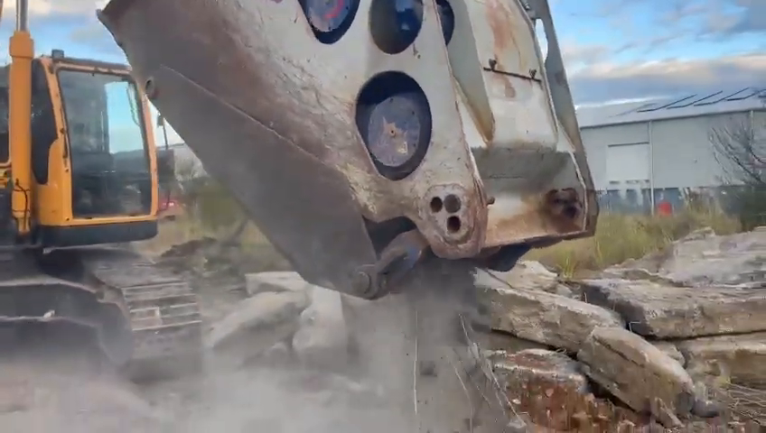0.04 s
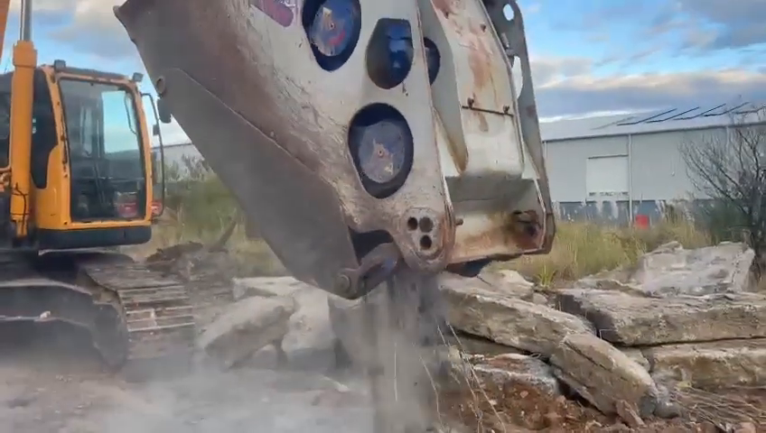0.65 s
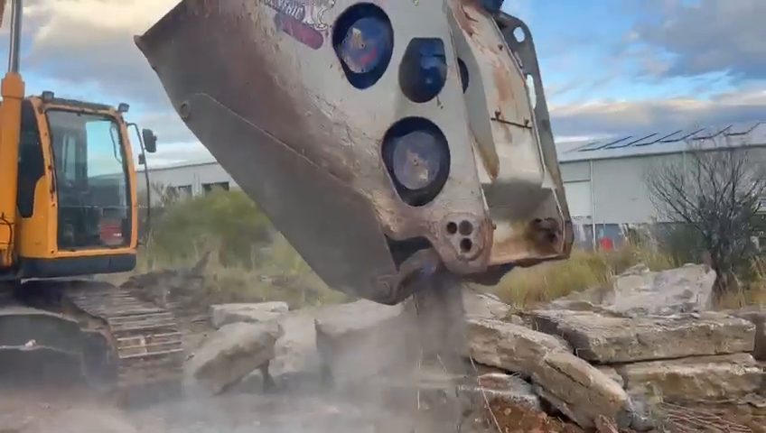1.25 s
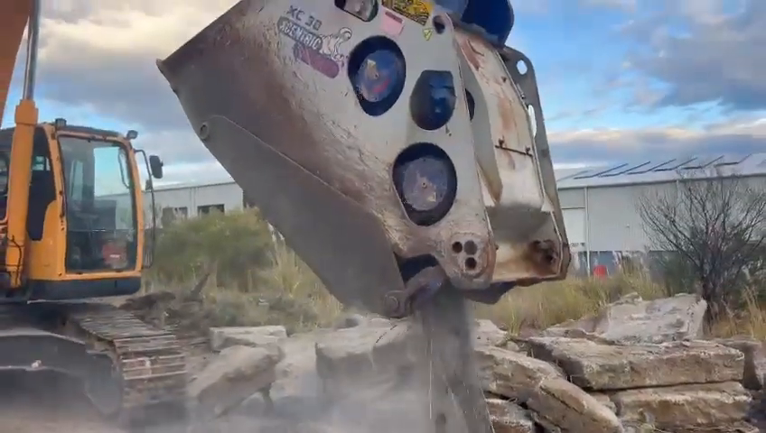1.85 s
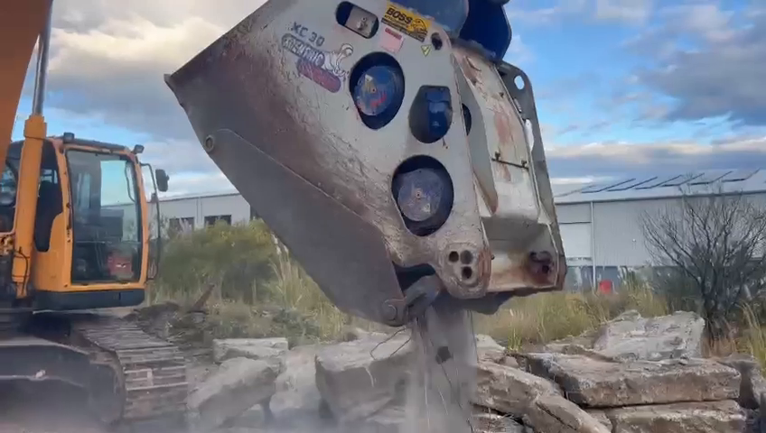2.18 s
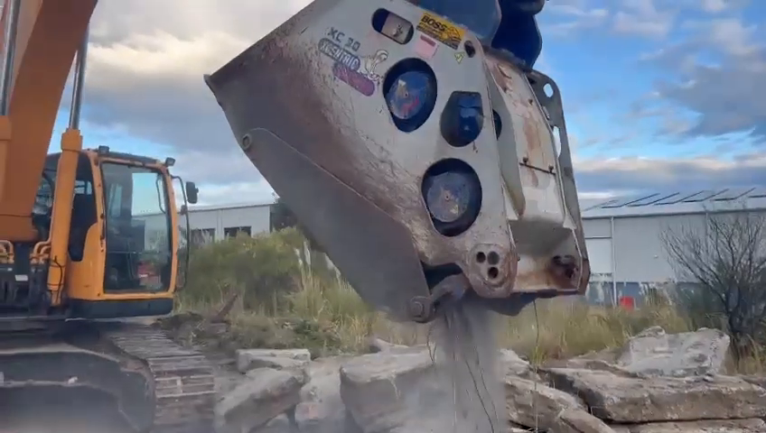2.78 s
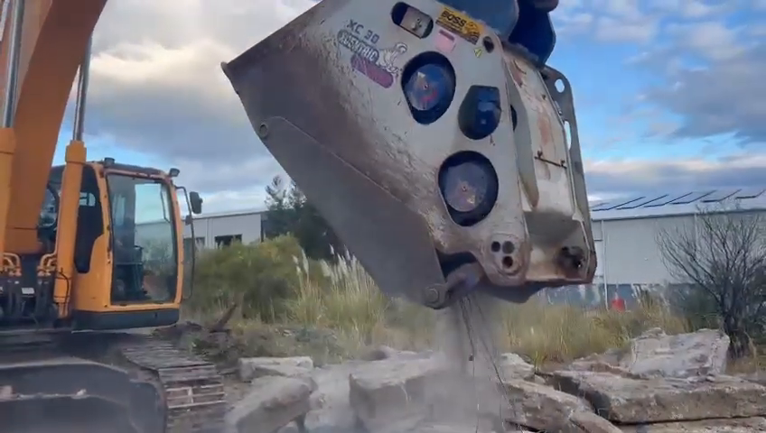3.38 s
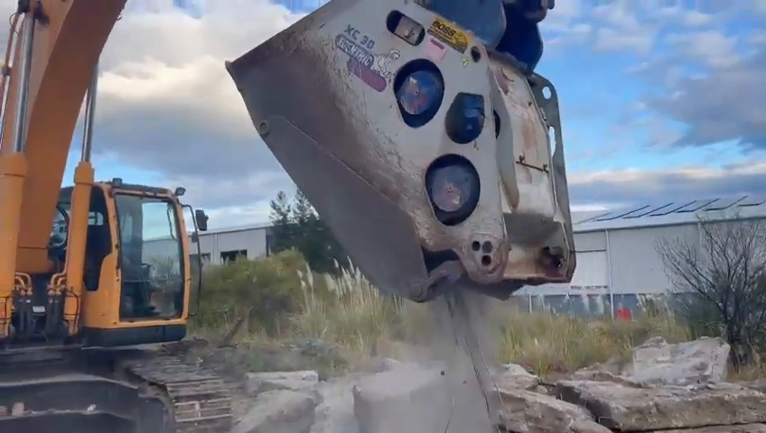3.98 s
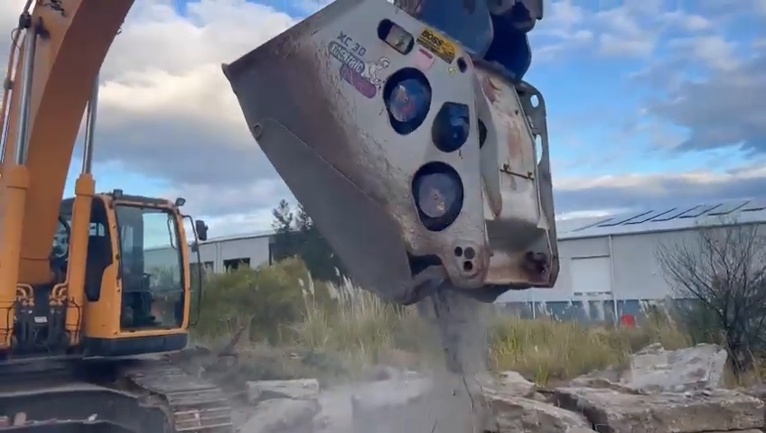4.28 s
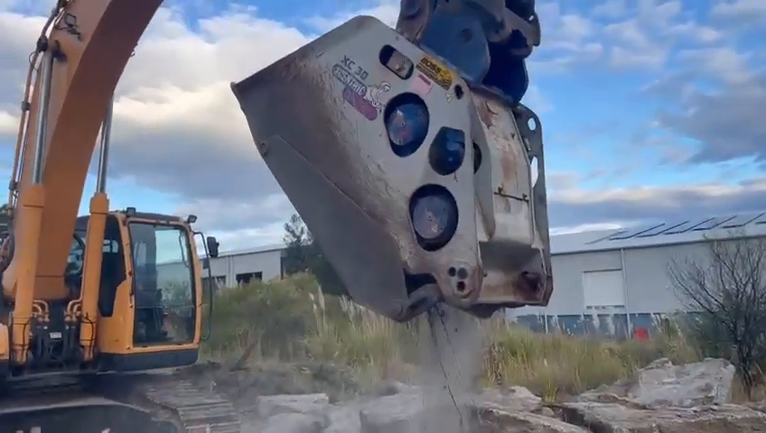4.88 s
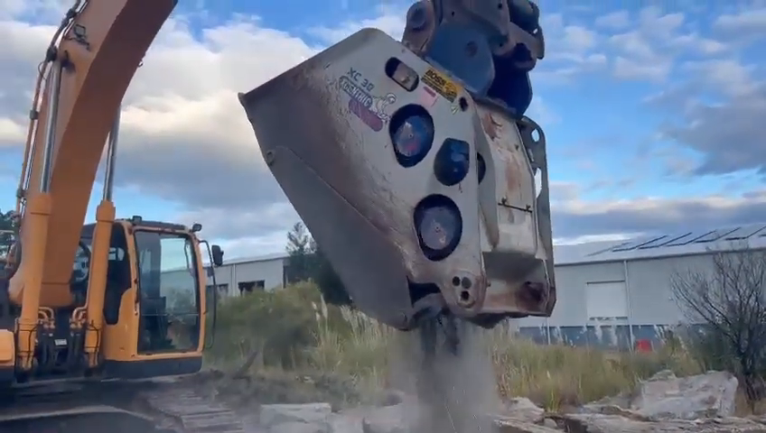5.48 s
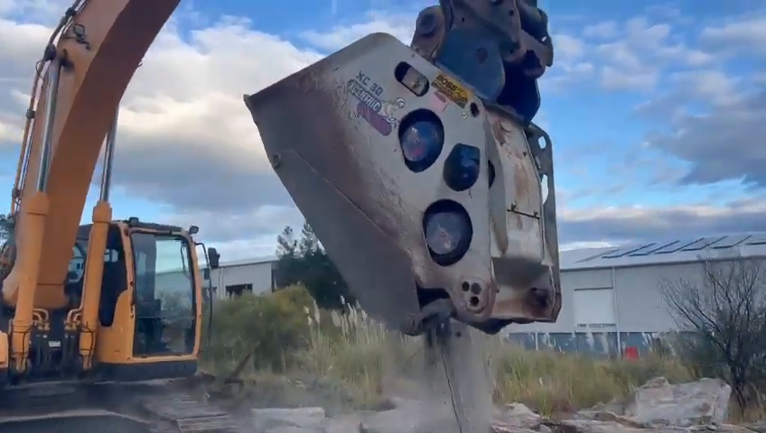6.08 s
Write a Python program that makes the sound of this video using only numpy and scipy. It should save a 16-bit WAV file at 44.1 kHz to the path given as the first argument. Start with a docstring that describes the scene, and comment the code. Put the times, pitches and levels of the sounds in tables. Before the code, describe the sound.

Outdoors, a few metres from an excavator, a steel crusher bucket chews concrete at up to seven bites a second, each a burst of grinding cracks with a deep thump. The diesel engine drones throughout and fine grit patters down. The crunching pauses, returns with a sharp double snap, then thins out as a hydraulic whine grows louder.

```python
"""Outdoors, a few metres from an excavator that grinds concrete rubble in a jaw-crusher bucket.
The jaw bites up to about seven times a second: each bite is a burst of cracks and a thump in the
steel bucket. Grit pours out underneath and the diesel engine drones on. Near the end the jaw runs
light, and the whine of its hydraulic drive grows louder."""
import sys
import numpy as np
from scipy import signal
from scipy.fft import rfft, irfft, next_fast_len
from scipy.io import wavfile
from scipy.ndimage import uniform_filter1d, map_coordinates

SR = 44100
rng = np.random.default_rng(int(sys.argv[2]) if len(sys.argv) > 2 else 0)


def persist_wave(psi):
    """Save psi, clipped to +-1, as 16-bit WAV."""
    counts = np.round(np.clip(psi, -1, 1) * 32767).astype(np.int16)
    wavfile.write(sys.argv[1], SR, np.atleast_2d(counts).T)


N = 270774
TIME = np.arange(N) / SR
FFT_SIZE = next_fast_len(N + SR)
FREQS = np.fft.rfftfreq(FFT_SIZE, 1 / SR)

# bites of the jaw: t/s, length/s, grinding/dB, cracking/dB, splintering/dB, thump/dB
JAW_BITES = [(-0.036, 0.04, -24.5, -30, -48, -22.5), (0.067, 0.086, -21.0, -25.5, -42, -23.5),
             (0.223, 0.067, -21.5, -28.5, -47, -25.5), (0.366, 0.073, -22.5, -26, -43, -23.5),
             (0.463, 0.168, -32.0, -34, -47, -34.5), (0.631, 0.075, -25, -32.5, -54.0, -27.5),
             (0.788, 0.078, -30.5, -30.5, -50, -33.0), (0.942, 0.051, -21.5, -23.5, -37, -21),
             (1.068, 0.12, -29, -30, -47.5, -28), (1.229, 0.093, -22, -23, -37.5, -30),
             (1.351, 0.12, -26, -27, -46, -25), (1.535, 0.089, -22.5, -23.5, -39, -24.0),
             (1.681, 0.066, -28, -32.5, -45, -29.5), (1.834, 0.087, -28.5, -30, -45.5, -27),
             (2, 0.067, -25.5, -25.0, -35.5, -22), (2.101, 0.14, -27.5, -32.5, -46.5, -26.5),
             (2.292, 0.072, -25, -24, -37, -21), (2.426, 0.13, -28, -25, -38, -22.5),
             (2.59, 0.076, -27.5, -31.0, -43.0, -28), (2.745, 0.093, -25, -21.5, -32.5, -21),
             (2.88, 0.067, -24, -24, -39, -20.5), (3.04, 0.087, -29.5, -30.5, -41.5, -27.5),
             (3.2, 0.047, -26.5, -26.5, -42.5, -27), (3.349, 0.054, -29.5, -30.0, -40.0, -26),
             (3.505, 0.04, -16.5, -17.5, -26.5, -15.5), (3.692, 0.067, -32.5, -31.5, -48.0, -27.5),
             (4.559, 0.056, -18.5, -17.0, -31.5, -19.5), (4.704, 0.047, -23, -27, -40.5, -26),
             (4.853, 0.029, -24, -31, -52, -28), (4.995, 0.029, -22, -27.5, -45, -31.0),
             (5.227, 0.074, -32.5, -31.5, -46, -34.5), (5.5, 0.057, -27, -25.5, -41.5, -25)]
# notes at which the steel bucket rings: f/Hz, width/Hz, level/dB
BUCKET_NOTES = [(332, 10.4, -1), (627, 14.5, 0.5), (740, 11, -3), (895, 23, 2), (1511, 14, -2),
                (1774, 25, -2)]


def gain_of(db):
    """Turns decibels into a factor to multiply by."""
    return 10 ** (np.asarray(db) / 20)


def unit_power(x):
    """Scales a signal to an average power of 1."""
    return x / np.sqrt(np.mean(x ** 2) + 1e-20)


def over_frequency(rows):
    """Joins the points of a frequency table into a curve."""
    hz, value = np.transpose(rows)
    return np.interp(np.log(FREQS + 1), np.log(hz + 1), value)


def over_time(rows):
    """Joins the points of a time table into one curve for each column."""
    times, *columns = np.transpose(rows)
    return [np.interp(TIME, times, column) for column in columns]


def coloured(x, spectrum):
    """Gives a sound the tone colour of a table; white noise would keep its power."""
    gain = gain_of(over_frequency(spectrum))
    return irfft(rfft(x, FFT_SIZE) * gain / np.sqrt(np.mean(gain ** 2)), FFT_SIZE)[..., :N]


def wander(rate_hz):
    """A slow random wobble: a smooth line through random points."""
    points = rng.standard_normal(size=512)
    coarse_time = TIME[::100]
    line = map_coordinates(points, [coarse_time * rate_hz * 2], order=3, mode="wrap")
    return unit_power(np.interp(TIME, coarse_time, line))


def partials(hz, multiples, flutter):
    """Pure tones at multiples of one frequency, each fluttering on its own."""
    turns = np.cumsum(hz) / SR
    out = np.zeros(N)
    for multiple, db in multiples:
        strength = gain_of(db) * (1 + flutter * wander(22))
        phase = 2 * np.pi * (multiple * turns + rng.random()) + flutter * wander(8.5)
        out += strength * np.sin(phase)
    return unit_power(out)


def clicks(per_s, spread_db):
    """Two streams of random clicks of uneven size, with a steady average power."""
    size = gain_of(spread_db * np.minimum(rng.exponential(1, (2, N)), 4))
    train = size * rng.choice([-1, 1], (2, N)) * (rng.random((2, N)) < per_s / SR)
    return train / np.sqrt(abs(uniform_filter1d(train ** 2, size=1800)) + 1e-4)


def blows(events, fall_s):
    """A loudness curve that jumps up at each blow and dies away."""
    out = np.zeros(N)
    for start, db in events:
        span = slice(*np.searchsorted(TIME, [start, start + .5]))
        out[span] += gain_of(db) * np.exp((start - TIME[span]) / fall_s)
    return out


def echoes(x, tail_s, echo_db):
    """Adds dense, dying echoes; several echo tails take turns, so the tail has no fixed tone colour."""
    t = TIME[:int(tail_s * SR)]
    fade = gain_of(-60 * t / tail_s) * (1 - np.exp(-t / .003))
    fade /= np.linalg.norm(fade)
    window = signal.windows.cosine(10000)
    hop = len(window) // 2
    padded = np.pad(x, [(0, 0), (hop, SR)])
    echo = np.zeros_like(padded)
    length = next_fast_len(len(window) + len(t))
    tails = rfft(fade * rng.standard_normal(size=(23, 2, len(t))), length)
    for turn, start in enumerate(range(0, N + hop, hop)):
        piece = padded[:, start:start + len(window)] * window
        echo[:, start:start + length] += irfft(rfft(piece, length) * tails[turn % len(tails)], length)
    return x + gain_of(echo_db) * echo[:, hop:hop + N]


def diesel():
    """The engine hums roughly at its firing rate, beating with its fan, over the roar of the exhaust."""
    # how the engine runs: t/s, firing rate/Hz, hum/dB, roar/dB
    running = [(0, 115.2, -36.5, -34.5), (2.4, 115.4, -29, -35.5), (3.6, 115.2, -30, -33),
               (4.45, 113.2, -37.5, -36.5), (5.0, 114.4, -37.5, -28.5), (6.14, 113.1, -37.5, -36)]
    # tones of the engine, its fan and its pump: multiple of the firing rate, level/dB
    tones = [(1, -1), (1.17, -7.5), (3, -13.5), (12, -30)]
    # tone colour of the exhaust: f/Hz, level/dB
    exhaust_colour = [(20, -23), (80, -8), (135, 3.5), (210, -5), (320, -0.5), (480, -11.5), (780, -9.5),
                      (1080, -14.5), (1350, -12), (2300, -14.5), (3000, -28), (5000, -36), (12000, -61)]
    firing_hz, hum_db, roar_db = over_time(running)
    hum = gain_of(hum_db) * partials(firing_hz * (1 + 0.011 * wander(7)), tones, flutter=.48)
    roar = coloured(rng.standard_normal((2, N)), exhaust_colour)
    return hum, roar * gain_of(roar_db + 1.97 * wander(9.2))


def hydraulic_drive():
    """The jaw's motor whines, its speed swinging with the load; tones swell near a note of the bucket."""
    # how the motor runs: t/s, piston rate/Hz, level/dB
    running = [(4.5, 152.1, -45), (5.02, 153.1, -37.5), (5.13, 158.4, -37), (5.3, 161.7, -39.5),
               (5.44, 159.8, -40), (5.65, 155.9, -38.5), (5.97, 151.7, -42), (6.14, 150.2, -37.5)]
    # tones of the whine: multiple of the piston rate, level/dB
    tones = [(2, -1), (4, -4), (5, -2), (8, 3), (9, -1), (10, -2), (11, -10), (13, -3), (15, -7)]
    piston_hz, whine_db = over_time(running)
    whine = gain_of(whine_db) * partials(piston_hz * (1 + .0007 * wander(8)), tones, flutter=.28)
    boost = sum(1 / (1 + ((FREQS - hz) / width) ** 2) for hz, width, _ in BUCKET_NOTES)
    return irfft(rfft(whine, FFT_SIZE) * (1 + boost), FFT_SIZE)[:N]


def gushes():
    """A power curve for the grit: each stroke of the jaw, biting or empty, shakes out one gush."""
    delay_s, rise_s, fall_s = 0.029, 0.026, 0.016
    empty_from_s, empty_strokes_per_s = 5, 5.7
    biting = np.transpose(JAW_BITES)[0] + delay_s
    empty = np.arange(empty_from_s, TIME[-1], 1 / empty_strokes_per_s)
    power = np.zeros(N)
    for peak in [*biting, *empty]:
        span = slice(*np.searchsorted(TIME, [peak - .5, peak + .5]))
        t = TIME[span] - peak
        power[span] += np.exp(-2 * (t / np.where(t < 0, rise_s, fall_s)) ** 2)
    return power


def falling_grit():
    """Fine crushed stone patters down in gushes, with a short tick or spurt now and then."""
    # grit under the bucket: t/s, thin stream/dB, gush/dB
    flow = [(0, -47, -56), (1.1, -51.5, -57), (2.3, -52, -50.5), (3.2, -56.5, -49), (4.1, -58, -60),
            (4.75, -54, -42.5), (5.05, -58.5, -55), (5.7, -53, -48)]
    # short ticks of chips and small spurts of grit: t/s, level/dB
    ticks_and_spurts = [(.352, -43), (0.7966, -35.5), (1.55, -40), (2.16, -42), (2.772, -39.5),
                        (3.22, -39.5), (3.8152, -47), (3.8916, -46), (4.1983, -46), (4.26, -47),
                        (5.3833, -43), (5.764, -42), (6.045, -45)]
    # tone colour of grit and chips: f/Hz, level/dB
    grit_colour = [(1500, 0.5), (5000, -6), (7800, 3.5), (9600, -2.5), (11500, -0.5)]
    stream_db, gush_db = over_time(flow)
    power = gain_of(stream_db + 2.7 * wander(11)) ** 2 + gain_of(gush_db) ** 2 * gushes()
    patter = echoes(clicks(per_s=950, spread_db=3) * np.sqrt(power), tail_s=0.024, echo_db=2)
    bursts = clicks(per_s=7100, spread_db=4.5) * blows(ticks_and_spurts, fall_s=0.01)
    return coloured(gain_of(1.5) * patter + gain_of(5.5) * bursts, grit_colour)


def knocks():
    """A shifting lump of rubble sets the bucket ringing briefly on one note."""
    # lumps that shift: t/s, f/Hz, level/dB
    lumps = [(.678, 195, -19), (.968, 150, -18), (2.325, 190, -15), (2.525, 173, -16), (2.93, 94, -13),
             (3.22, 96, -16), (3.521, 160, -13), (3.565, 221, -15), (4.6, 135, -11), (4.902, 179, -15),
             (5.018, 640, -22)]
    rise_s, ring_s = 0.0085, 0.22
    out = np.zeros(N)
    for start, hz, db in lumps:
        span = slice(*np.searchsorted(TIME, [start, start + .5]))
        t = TIME[span] - start
        loudness = gain_of(db - 60 * t / ring_s) * (1 - np.exp(-t / rise_s))
        out[span] += loudness * np.sin(2 * np.pi * hz * t)
    return out


def jaw_force(levels_db, fall_s, build_share=0.49):
    """In each bite the force builds for a share of its length, holds as the stone breaks, and lets go."""
    power = np.zeros(N)
    for (start, length, *_), db in zip(JAW_BITES, levels_db):
        span = slice(*np.searchsorted(TIME, [start, start + .5]))
        t = TIME[span] - start
        build = np.clip(t / (build_share * length), 0, 1) ** 2
        force = build * np.exp(-np.maximum(t - length, 0) / fall_s)
        power[span] += (gain_of(db) * force) ** 2
    return np.sqrt(power)


def bucket_thumps(levels_db):
    """Each bite shakes the whole bucket with a deep thump."""
    # tone colour of a thump: f/Hz, level/dB
    thump_colour = [(25, -35), (60, -16.5), (90, -2.5), (112, -10), (132, 0), (200, -4), (290, -5),
                    (420, -12), (800, -58)]
    rumble = coloured(clicks(per_s=500, spread_db=2), thump_colour)
    steady_rumble = rumble / np.sqrt(uniform_filter1d(rumble ** 2, size=2600) + 1e-4)
    thumps = steady_rumble * jaw_force(levels_db, fall_s=0.051)
    return echoes(gain_of(-1.33) * thumps, tail_s=0.46, echo_db=-3)


def ringing_plates(hits):
    """The steel plates ring; how strongly each note answers depends on where the stone presses."""
    out = np.zeros((2, N))
    for hz, width, db in BUCKET_NOTES:
        pole = np.exp((-np.pi * width + 2j * np.pi * hz) / SR)  # sets the pitch and fade of one note
        push = hits * gain_of(db + 3.5 * wander(4))
        out += signal.lfilter([np.sqrt(1 - abs(pole) ** 2)], [1, -pole], push + 1e-18).real
    return out


def uneven_stone(x, patchy_db):
    """Each piece of stone breaks with its own colour: random patches of pitch get louder or softer."""
    spectra = signal.stft(x, nperseg=512, noverlap=384)[2]
    patches = rng.standard_normal(spectra.shape[1:])
    patches = uniform_filter1d(patches, size=4, axis=0)  # smooth across pitch
    patches = unit_power(uniform_filter1d(patches, size=16, axis=1))  # and across time
    return signal.istft(spectra * gain_of(patchy_db * patches), nperseg=512, noverlap=384)[1][:, :N]


def crusher():
    """Concrete grinds, cracks, splinters and snaps in the jaw, making the bucket thump and ring."""
    # blocks that give way with one sharp snap: t/s, level/dB
    snapping_blocks = [(.966, -23), (1.576, -20), (2.322, -26), (2.522, -23), (2.778, -27), (3.073, -25.5),
                       (3.215, -32), (3.524, -19), (3.555, -21), (4.585, -14.5), (4.602, -14), (4.867, -29),
                       (5.385, -26)]
    # tone colours of low grinding, cracking and bright splintering: f/Hz, level/dB
    grind_colour = [(55, -38), (200, 0), (350, -0.5), (760, 0), (1000, -3.5), (1500, -38)]
    crack_colour = [(520, -29), (1050, -1), (1500, 2), (1950, -.5), (2400, -10.5), (3000, -25.5),
                    (9000, -65)]
    splinter_colour = [(1300, -17), (2500, 5.5), (3600, -2), (5000, -10), (12000, -22)]
    _, _, grind_db, crack_db, splinter_db, thump_db = np.transpose(JAW_BITES)
    snaps = blows(snapping_blocks, fall_s=0.0098)

    # hypot adds two loudness curves by their power
    rubs = clicks(per_s=1700, spread_db=2) * np.hypot(jaw_force(grind_db, fall_s=0.055), snaps)
    grinding = coloured(echoes(rubs, tail_s=.029, echo_db=-6), grind_colour)

    fractures = clicks(per_s=1400, spread_db=1)
    breaks = fractures * np.hypot(jaw_force(crack_db, fall_s=0.036), snaps)
    cracking = coloured(echoes(breaks, tail_s=.025, echo_db=-5), crack_colour)

    late_force = jaw_force(splinter_db, fall_s=0.024, build_share=0.63)  # splinters come at full force
    splinters = fractures * np.hypot(late_force, gain_of(-14.5) * snaps)
    splintering = coloured(echoes(splinters, tail_s=.014, echo_db=2.5), splinter_colour)

    stone = gain_of(-5) * uneven_stone(grinding + cracking + splintering, patchy_db=2.2)
    thumps = bucket_thumps(thump_db)
    steel = gain_of(-21.5) * ringing_plates(rubs + breaks)
    return thumps + echoes(stone + steel, tail_s=0.6, echo_db=-18.5)


def stereo(centred, spread):
    """Two close listening points hear nearly the same bass and drift apart in the treble."""
    # how alike left and right are: f/Hz, likeness (1 = the same)
    likeness = [(30, .992), (90, .9994), (250, .9982), (600, .97), (1280, 0.87), (3100, 0.7), (5500, 0.35),
                (8200, 0.6), (9800, .995)]
    # how far the left wave runs ahead: f/Hz, phase/rad
    left_lead = [(900, 0), (3000, .4), (7800, .45), (8900, -.5), (9700, -2.8), (10700, -3.4), (11300, -6.2)]
    # how much louder the left is: f/Hz, level/dB
    balance = [(250, 0), (650, -1.9), (2100, -1.5), (4000, 1.6), (12000, -0.3)]
    alike = over_frequency(likeness)
    mid, side = rfft(spread, FFT_SIZE) * np.sqrt([(1 + alike) / 2, (1 - alike) / 2])
    mid = mid + rfft(centred, FFT_SIZE)
    lean = gain_of(over_frequency(balance) / 2) * np.exp(.5j * over_frequency(left_lead))
    return irfft(np.array([(mid + side) * lean, (mid - side) / lean]), FFT_SIZE)[:, :N]


def scene():
    """Machine and rubble, all straight ahead."""
    hum, roar = diesel()
    return stereo(centred=hum + hydraulic_drive() + knocks(), spread=roar + crusher() + falling_grit())


def record(dry):
    """Rounds off the loudest peaks, then cuts the highest treble."""
    ceiling, cutoff_hz = .85, 11850
    rounded = dry / (1 + (dry / ceiling) ** 6) ** (1 / 6)
    treble_cut = signal.firwin(301, cutoff_hz, window=("kaiser", 9), fs=SR)
    return signal.oaconvolve(rounded, treble_cut[None], "same")


dry = scene()
out = record(dry)
persist_wave(out)
```